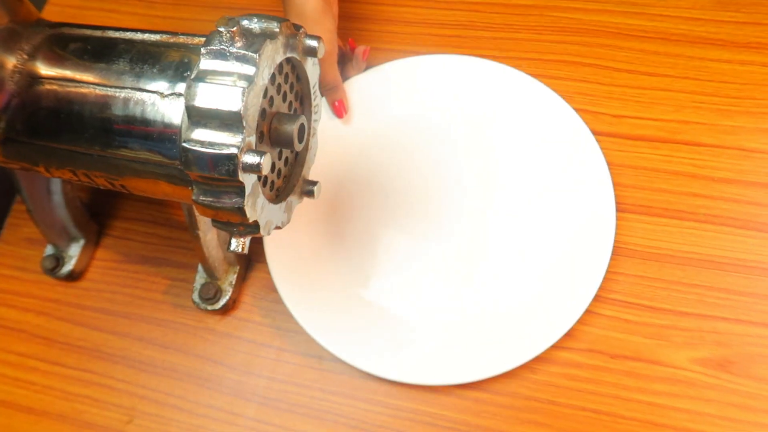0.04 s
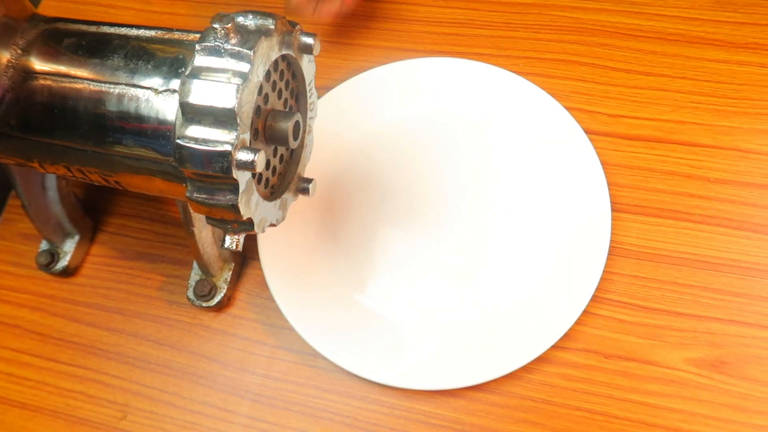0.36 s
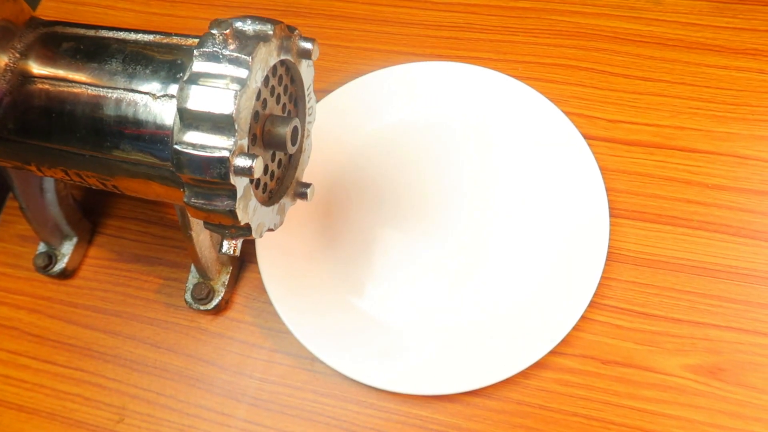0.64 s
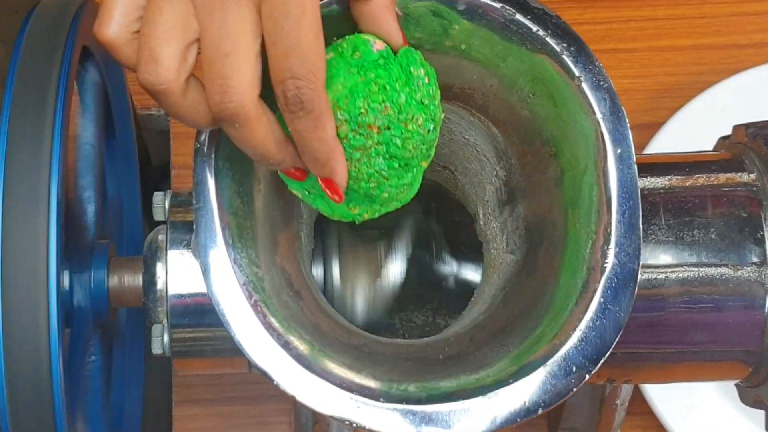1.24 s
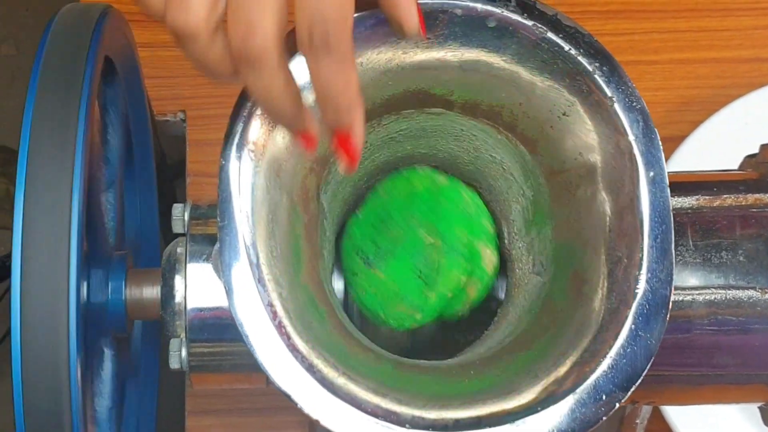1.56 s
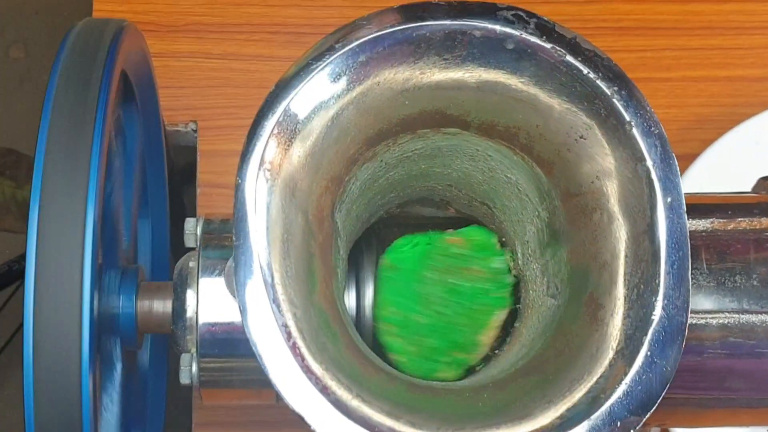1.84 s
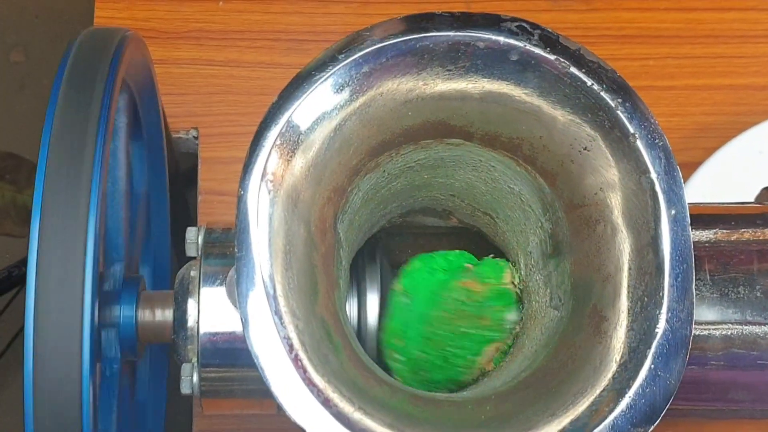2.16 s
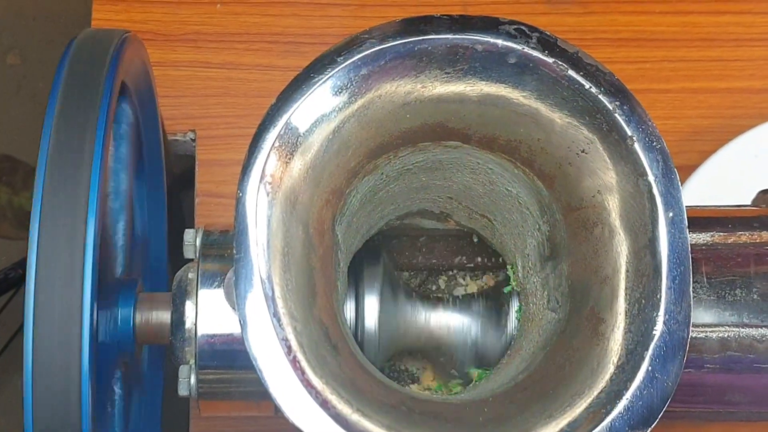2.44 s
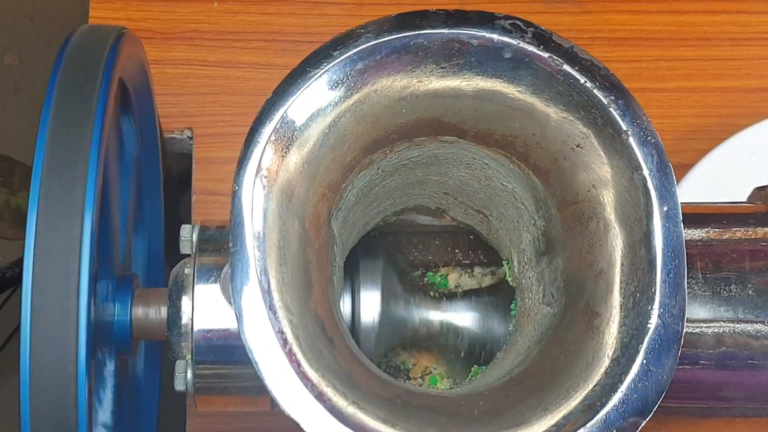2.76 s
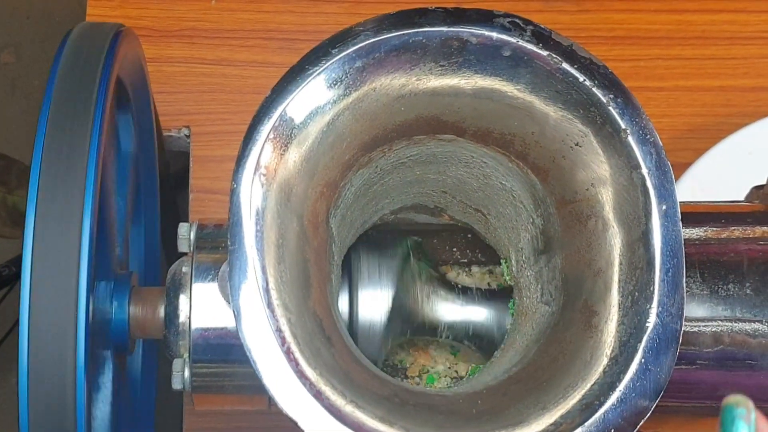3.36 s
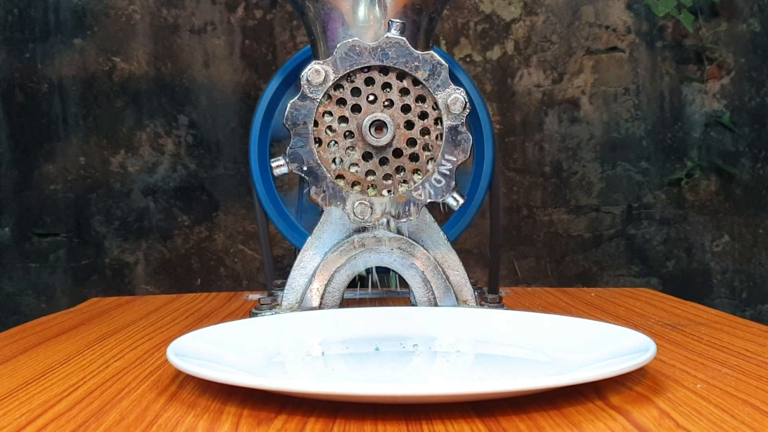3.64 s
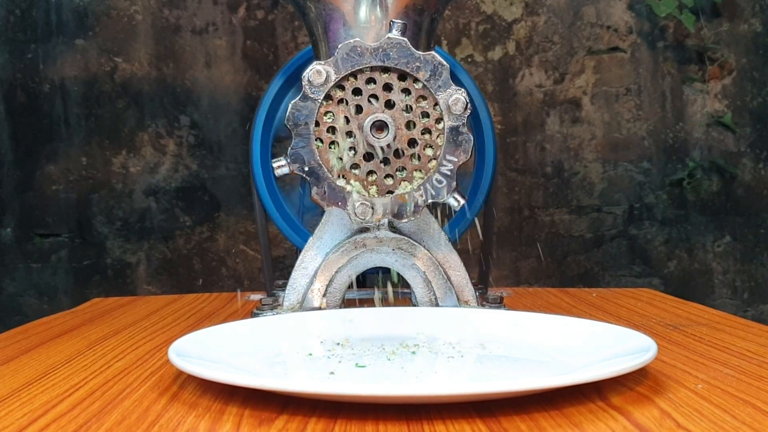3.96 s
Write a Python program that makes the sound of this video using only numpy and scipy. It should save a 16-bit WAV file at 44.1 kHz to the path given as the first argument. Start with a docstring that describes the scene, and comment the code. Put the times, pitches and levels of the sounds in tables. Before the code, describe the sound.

A meat grinder hums faintly while a plate squeaks and scrapes on a table. At 0.8 seconds the grinder is suddenly close, rumbling with metallic knocks up to seven times a second. A cookie rattles in at about 1.7 seconds and cracks in crunchy bursts until 2.8. Crumbs keep grinding, turning drier from 3.5 seconds as the table resonates with the knocks, until about 4.

```python
"""At a wooden table with a belt-driven meat grinder. A plate scrapes and squeaks under the outlet
while the motor hums. Then, close over the hopper: the frame rumbles and the auger knocks about once
a turn; a cookie rattles in, fractures in a few bites and is ground to crumbs in the ringing steel
barrel. Last, the grinding is heard from the outlet side, where the table resonates too."""
import sys
import numpy as np
from scipy import signal
from scipy.fft import rfft, irfft, next_fast_len
from scipy.io import wavfile
from scipy.ndimage import uniform_filter1d, map_coordinates

SR = 44100
rng = np.random.default_rng(int(sys.argv[2]) if len(sys.argv) > 2 else 0)


def transcribe(signal):
    """Save signal, clipped to [-1, 1], as a 16-bit WAV file at the path in sys.argv[1]."""
    frames = np.atleast_2d(signal).T
    limited = np.clip(frames, -1, 1)
    pcm = np.round(limited * 32767).astype(np.int16)
    wavfile.write(sys.argv[1], SR, pcm)


N = 176400
HOPPER_S, OUTLET_S = .791, 3.48  # listener moves to the hopper, then the outlet

# The cookie hits the throat, rattles on the auger. Each row: start in seconds, level in dB.
THROAT_HITS = [(1.944, -12), (2.156, -30)]
AUGER_HITS = [(1.663, -33), (1.676, -28)]


def machine(outlet):
    """Motor tones, plus frame rumble and auger rub that pulse twice a turn; outlet blends 0-1."""
    # Each row: frequency in Hz, level in dB at the hopper, level in dB at the outlet.
    motor_tones = [(102.6, -41, -53), (142.04, -38.5, -40), (297.4, -36.5, -43), (597.7, -46, -38.5)]
    # Spectra. Each row: frequency in Hz, gain in dB.
    frame_eq = [(30, -35), (85, -6), (150, 2), (225, -12.5), (290, 0.5), (395, -3.5), (428, -10.5),
                (468, 4), (515, -4.5), (670, -22), (850, -16), (1300, -37.5), (9000, -77)]
    table_eq = [(230, -40), (310, -6), (400, -2), (435, -9.5), (500, -4.5), (550, -15), (620, -13),
                (690, -28.5), (1500, -62)]
    rub_eq = [(500, -11), (900, 4.5), (1120, -7.5), (1800, -3), (3500, -13.5), (4400, -20.5), (5400, -14),
              (6600, -35.5), (8400, -43), (10700, -25), (15800, -38)]
    turn_hz, swing_db = 7.03, 2.1
    pulse = amp(swing_db * np.cos(2 * np.pi * 2 * turn_hz * (clock() - HOPPER_S - .015)))
    hum = sum(amp(near_db + outlet * (far_db - near_db) + 1.9 * wobble(16)) * tone(hz, 0.6, 9)
              for hz, near_db, far_db in motor_tones)
    rumble = amp(-27.5) * noise(frame_eq) + outlet * amp(-29.0) * noise(table_eq)
    rub = amp(-43.5 + 1.9 * wobble(24.33)) * unit(barrel(noise(rub_eq)))
    return hum + pulse * (rumble + rub)


def knocks():
    """Each auger knock clanks in the steel barrel, then swells in the frame and table."""
    # Each row: start in seconds, clank level in dB, thud level in dB.
    hits = [(.792, -24, -8), (.943, -37.5, -13), (1.076, -32, -42), (1.219, -31.5, -15.5),
            (1.359, -30.5, -16.5), (1.499, -23, -13), (1.632, -25, -15.5), (1.795, -31, -13.5),
            (1.942, -33.5, -15), (2.065, -28, -17), (2.357, -21.5, -19.5), (2.499, -19, -9.5),
            (2.642, -24.5, -16), (2.785, -28, -17), (3.212, -27, -13.5), (3.349, -23.5, -6),
            (3.497, -44, -15.5), (3.64, -38, -18), (3.777, -39, -18), (3.931, -31.5, -11)]
    # Contact noise. Each row: frequency in Hz, gain in dB.
    contact_eq = [(600, 1), (1750, 6.5), (2500, 0), (4500, -11), (8000, -35), (11000, -22), (15000, -21)]
    # Each row: frequency in Hz, gain in dB, T60 in seconds.
    steel_modes = [(1781, -1, 0.065), (2056, -8.5, 0.084), (3270, -23.5, 0.13)]
    frame_modes = [(293, -1.5, 0.046), (477.8, 11.5, 0.054), (517.4, 0, 0.065)]
    table_modes = [(402, 1, 0.2), (466, -2.5, 0.064), (825, -8.5, 0.052)]
    out, strikes = np.zeros(N), np.zeros(N)
    for s, clank_db, thud_db in hits:
        strikes += amp(clank_db) * envelope(s, 0.001, 0.00051, t60_s=0.047)
        thud = ring(s, frame_modes, 0.0095) if s < OUTLET_S else ring(s, table_modes, 0.0015)
        out += amp(clank_db) * ring(s, steel_modes, rise_s=0.00062) + amp(thud_db) * thud
    return out + colour(strikes * rng.standard_normal(N), contact_eq)


def bites():
    """The auger crushes the cookie in bursts of fractures that ring the barrel."""
    # Each row: start in seconds, hold in seconds, level in dB, release T60 in seconds.
    bursts = [(1.744, 0.038, -22.5, 0.14), (1.902, 0.025, -37, 0.053), (2.166, 0.06, -24.5, 0.012),
              (2.321, 0.029, -24.5, 0.056), (2.463, 0.0086, -22, 0.07), (2.488, 0.012, -27, 0.052),
              (2.77, 0.035, -34.5, 0.13)]
    # Each row: frequency in Hz, gain in dB.
    crunch_eq = [(500, -18), (750, 1.5), (1300, -4.5), (2040, -1), (3350, -0.5), (4500, -7.5), (5800, -5.5),
                 (6700, -24), (8600, -30), (10500, -10), (15800, -17.5)]
    force = sum(amp(db) * envelope(s, 0.0064, hold_s, t60_s) for s, hold_s, db, t60_s in bursts)
    return barrel(colour(force * fractures(per_s=1700, spread_db=1.5, hiss=0.38), crunch_eq))


def snaps():
    """The crust cracks in single snaps and clicks where it hits steel."""
    # Each row: start in seconds, level in dB.
    breaks = [(1.779, -18.5), (2.212, -13), (2.313, -28), (2.342, -19), (2.456, -24.5), (2.472, -24)]
    # Each row: frequency in Hz, gain in dB.
    snap_eq = [(700, 0), (1800, -12), (3550, 1.5), (4500, -11), (5800, -11), (8000, -34), (11000, -20),
               (15000, -16)]
    clicks = [(s, db - 12.5) for s, db in THROAT_HITS + AUGER_HITS]
    cracks = sum(amp(db) * envelope(s, 0.00036, 0.0011, t60_s=0.014) for s, db in breaks + clicks)
    return colour(cracks * shards(rng.standard_normal(N)), snap_eq)


def bumps():
    """The tumbling cookie rings the throat and auger."""
    # Each row: frequency in Hz, gain in dB, T60 in seconds.
    throat_modes = [(743, 0, 0.019), (950, 1.5, 0.021), (1190, -5, 0.031), (3420, -8.5, 0.016)]
    auger_modes = [(3300, 1, 0.026)]
    throat = sum(amp(db) * ring(s, throat_modes, rise_s=0.00089) for s, db in THROAT_HITS)
    auger = sum(amp(db) * ring(s, auger_modes, rise_s=0.00089) for s, db in AUGER_HITS)
    return throat + auger


def crumbs(outlet):
    """Crumbs grind on as fine fractures: ringing at the hopper, dry at the outlet."""
    # Each row: time in seconds, level in dB.
    grind_levels = [(1.72, -56), (1.75, -35), (1.83, -41), (1.98, -54.5), (2.09, -40.5), (2.28, -59),
                    (2.39, -45.5), (2.54, -36), (2.74, -43), (2.98, -34), (3.15, -42), (3.47, -50),
                    (3.5, -26.5), (3.6, -33.5), (3.79, -33), (3.86, -43.5), (3.94, -35.5), (4, -44.5)]
    # Each row: frequency in Hz, gain in dB.
    hopper_eq = [(900, 1.5), (1900, -.5), (4000, -1), (4700, -11), (5600, -1), (7800, -31), (10800, -10),
                 (15800, -12.5)]
    outlet_eq = [(900, 4), (2800, -9), (5300, -2.5), (8000, -28), (10500, -9.5), (13000, -3.5), (15800, -8)]
    force = after(grind_levels[0][0]) * level(grind_levels)
    grit = force * fractures(per_s=2300, spread_db=1.7, hiss=0.76)
    return barrel(colour(grit * (1 - outlet), hopper_eq)) + colour(grit * outlet, outlet_eq)


def plate():
    """A plate scrapes, catches and squeaks over the table."""
    # Each row: time in seconds, level in dB.
    slide_levels = [(0, -30.5), (.035, -50), (.065, -39), (.11, -49), (.28, -50), (.32, -58.5),
                    (.55, -57.5), (.62, -53), (.72, -58)]
    ticks = [(.471, -42.5), (0.579, -44), (.637, -46)]
    # Each row: frequency in Hz, gain in dB.
    scrape_eq = [(1000, -4), (1130, 3), (1290, 1), (1400, -3.5), (1700, 2.5), (2450, -7), (3400, -6),
                 (5000, -21), (15000, -57)]
    # Each row: start, rise, end and release T60 in seconds, pitch in Hz, level in dB, roughness 0-1.
    squeaks = [(-.02, 0.017, 0.058, 0.12, 741, -30.5, 0.02), (0.15, 0.257, 0.48, 0.77, 3360, -54, 0.4)]
    catches = sum(amp(db) * envelope(s, 0.0023, 0, t60_s=0.049) for s, db in ticks)
    friction = grains(per_s=2200, spread_db=3.0, hiss=0.65)
    out = colour((level(slide_levels) + catches) * friction, scrape_eq)
    for s, rise_s, end_s, t60_s, hz, db, rough in squeaks:
        gain = amp(db + 9.4 * rough * wobble(48.6)) * envelope(s, rise_s, end_s - s, t60_s)
        out += gain * tone(hz, rough * 2, 200)
    return out


def distant_motor():
    """A hum over faint, low noise."""
    # Each row: frequency in Hz, gain in dB.
    air_eq = [(30, -9.5), (130, -2.5), (480, -11), (3300, -52), (8000, -56.5)]
    return amp(-40) * tone(hz=123.7, drift_rad=0.12, drift_per_s=4) + amp(-45.5) * noise(air_eq)


def barrel(x):
    """Add the short, dense ring of the steel barrel and hopper."""
    ring_db, t60_s = -8.5, 0.08
    tail = (rng.standard_normal(N) * amp(-60 * clock() / t60_s))[:SR // 4]
    return x + amp(ring_db) * signal.fftconvolve(x, tail / np.linalg.norm(tail))[:N]


def ring(s, modes, rise_s):
    """Damped modes struck at s, slightly detuned each time."""
    t = np.arange(SR // 4) / SR
    wave = sum(amp(db - 60 * t / t60_s) * np.sin(2 * np.pi * hz * (1 + 0.016 * rng.standard_normal()) * t)
               for hz, db, t60_s in modes)
    return np.pad(wave * (1 - np.exp(-(t / rise_s) ** 2)), (round(s * SR), N))[:N]


def fractures(per_s, spread_db, hiss):
    """Clumped, brittle grains, rms 1."""
    clumps = amp(1.7 * wobble(per_s=160))
    return shards(clumps * grains(per_s, spread_db, hiss))


def shards(x):
    """Each breaking fragment has its own random resonances."""
    spectra = signal.stft(x, nperseg=256)[2]
    peaks = uniform_filter1d(rng.standard_normal(spectra.shape), size=5, axis=0)
    gain_db = 3 * unit(uniform_filter1d(peaks, size=2, axis=1))
    return unit(signal.istft(spectra * amp(gain_db), nperseg=256)[1][:N])


def grains(per_s, spread_db, hiss):
    """Tiny clicks of random size over a fine hiss, rms 1."""
    size = amp(spread_db * np.clip(rng.standard_normal(N), -2, 2)) * np.sign(rng.standard_normal(N))
    clicks = unit(size * (rng.random(N) < per_s / SR))
    return unit(clicks + hiss * rng.standard_normal(N))


def tone(hz, drift_rad, drift_per_s):
    """Sine of rms 1 with wandering phase."""
    return np.sqrt(2) * np.sin(2 * np.pi * hz * clock() + drift_rad * wobble(drift_per_s))


def noise(eq):
    """Coloured noise, rms 1."""
    return unit(colour(rng.standard_normal(N), eq))


def colour(x, eq):
    """Causal unit-energy filter through (Hz, dB) points."""
    m = 2 * next_fast_len(N // 2 + 8192)
    hz = np.fft.rfftfreq(m, 1 / SR)
    eq_hz, eq_db = np.transpose(eq)
    low_cut = (hz / (hz + eq_hz[0] / 2)) ** 2
    gain = unit(amp(np.interp(np.log(hz + 1), np.log(eq_hz + 1), eq_db)) * low_cut + 1e-6)
    cepstrum = irfft(np.log(gain))
    cepstrum[1:m // 2] *= 2  # fold to minimum phase
    cepstrum[m // 2 + 1:] = 0
    return irfft(rfft(x, m) * np.exp(rfft(cepstrum)), m)[:N]


def envelope(start_s, rise_s, hold_s, t60_s):
    """Linear rise; exponential release from hold_s after the start."""
    t = clock() - start_s
    return np.clip(t / rise_s, 0, 1) * np.exp(-np.log(1000) * np.maximum(t - hold_s, 0) / t60_s)


def wobble(per_s):
    """Smooth random curve, per_s knots a second."""
    return map_coordinates(rng.standard_normal(int(N * per_s / SR) + 4), [clock() * per_s])


def level(rows):
    """Gain per sample from (s, dB) points."""
    return amp(np.interp(clock(), *np.transpose(rows)))


def after(s):
    """4 ms fade-in at s."""
    return np.clip((clock() - s) / .004, 0, 1)


def clock():
    """Seconds at each sample."""
    return np.arange(N) / SR


def unit(x):
    """Scale to rms 1."""
    return x / np.sqrt(np.mean(x ** 2) + 1e-20)


def amp(db):
    return 10 ** (np.asarray(db) / 20)


def scene():
    """Three listening positions in turn: plate, hopper, outlet."""
    close, outlet = after(HOPPER_S), after(OUTLET_S)
    opening = (1 - close) * (plate() + distant_motor())
    grinder = close * machine(outlet) + knocks()
    cookie = bites() + snaps() + bumps() + crumbs(outlet)
    return (opening + grinder + cookie)[None]


def record(dry):
    """The microphone has a narrow treble dip and a band limit."""
    dip_hz, half_width_hz, top_hz = 8230, 75, 15850
    m = next_fast_len(N + SR // 2)
    hz = np.fft.rfftfreq(m, 1 / SR)
    dip = amp(-13 * np.exp(-np.abs(hz - dip_hz) / half_width_hz))
    band = 1 / (1 + (hz / top_hz) ** 240)
    return irfft(rfft(dry, m) * dip * band, m)[:, :N]


dry = scene()
out = record(dry)
transcribe(out)
```